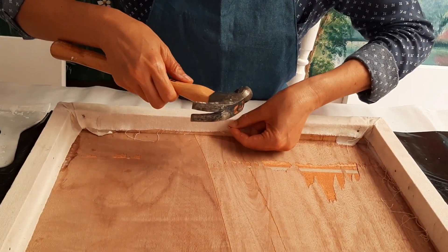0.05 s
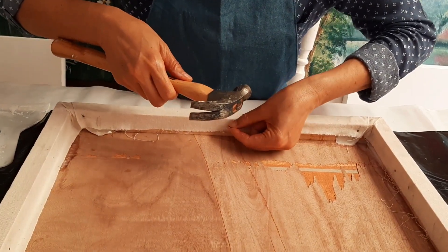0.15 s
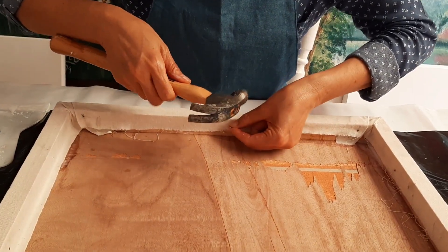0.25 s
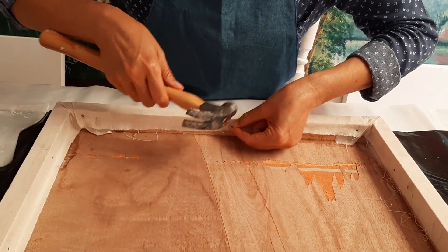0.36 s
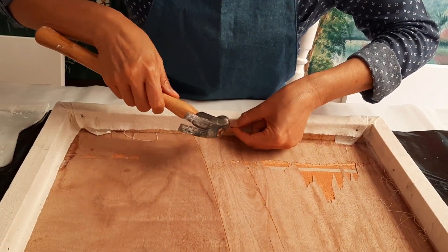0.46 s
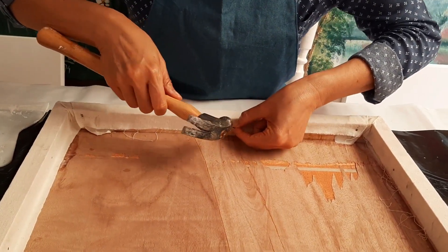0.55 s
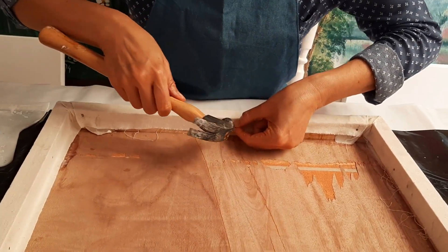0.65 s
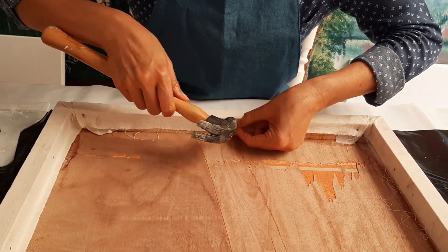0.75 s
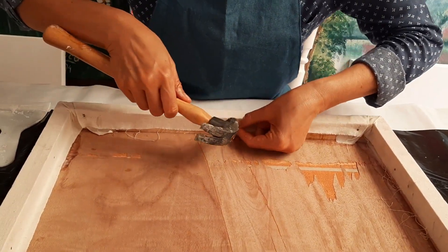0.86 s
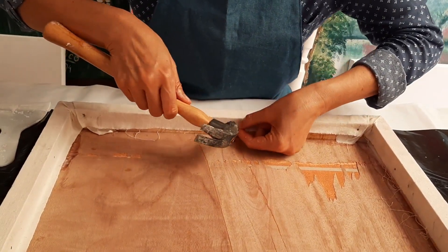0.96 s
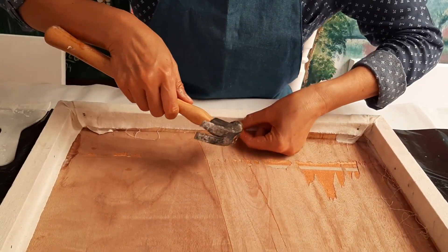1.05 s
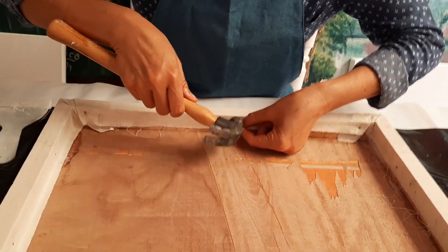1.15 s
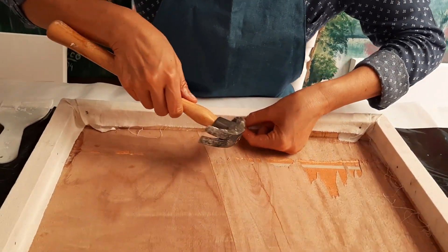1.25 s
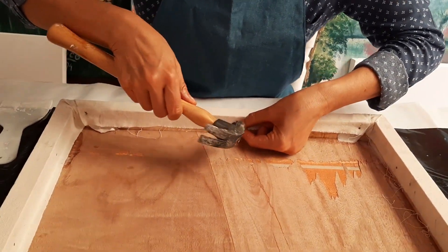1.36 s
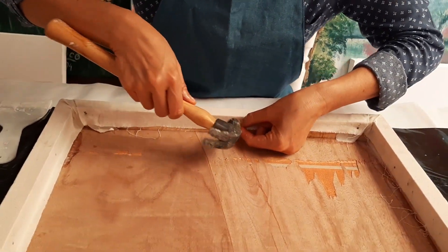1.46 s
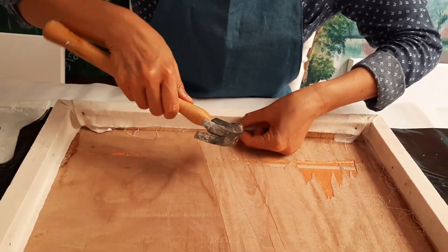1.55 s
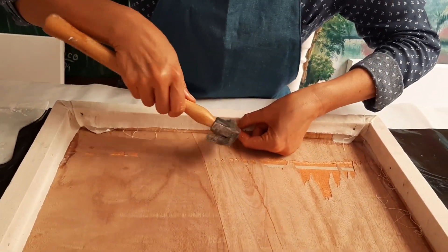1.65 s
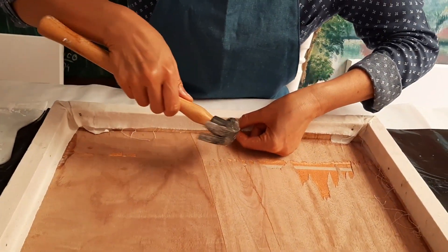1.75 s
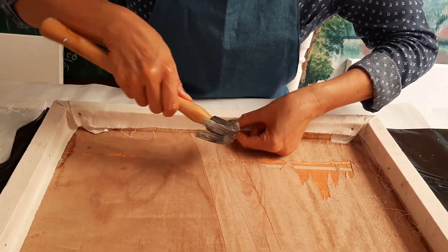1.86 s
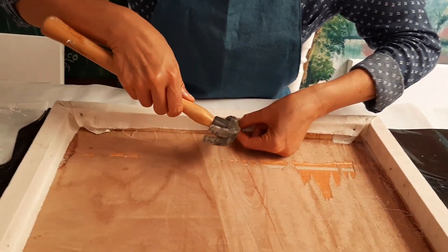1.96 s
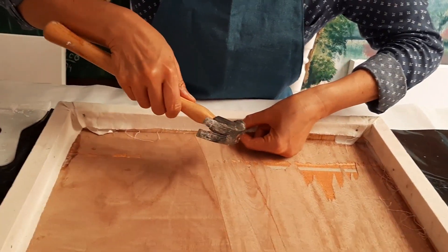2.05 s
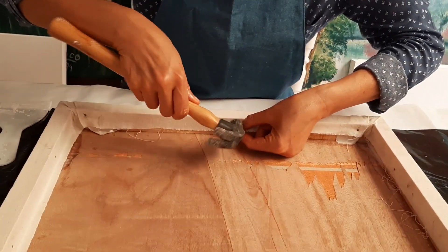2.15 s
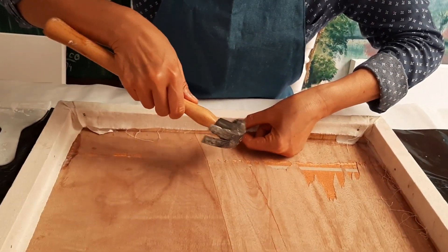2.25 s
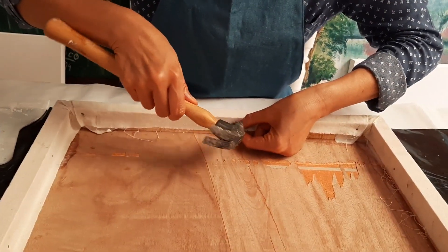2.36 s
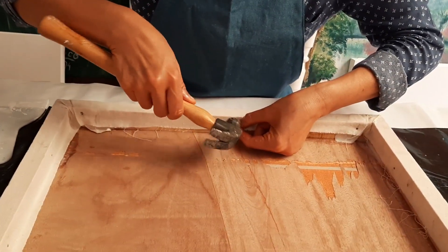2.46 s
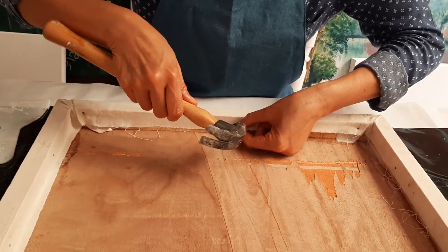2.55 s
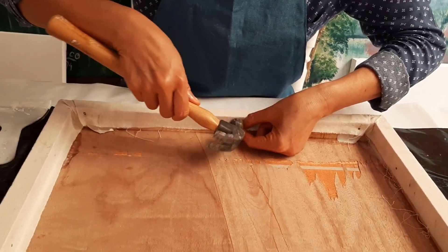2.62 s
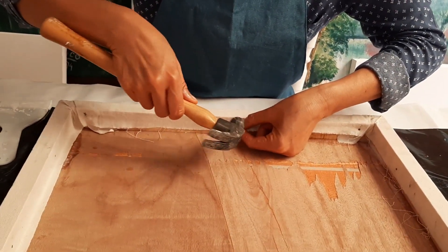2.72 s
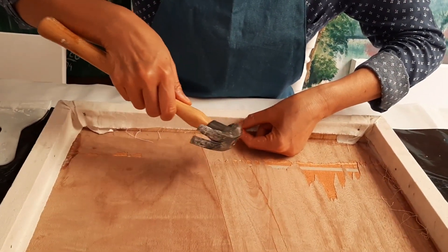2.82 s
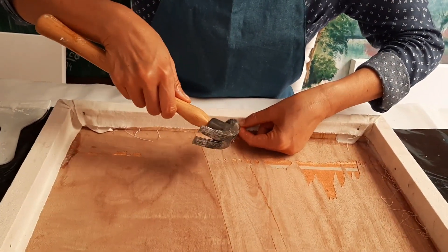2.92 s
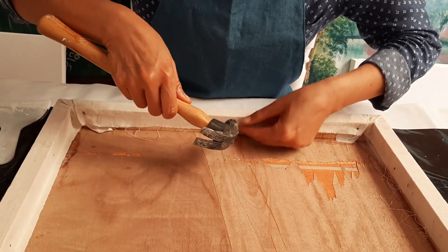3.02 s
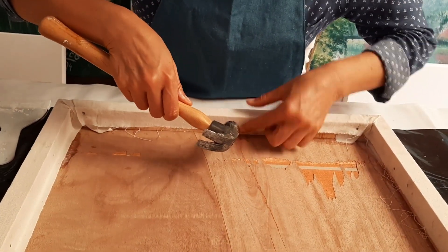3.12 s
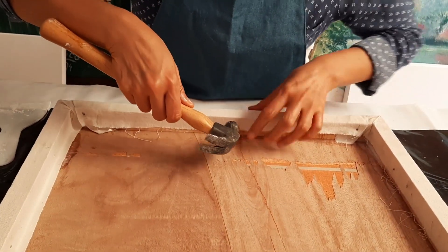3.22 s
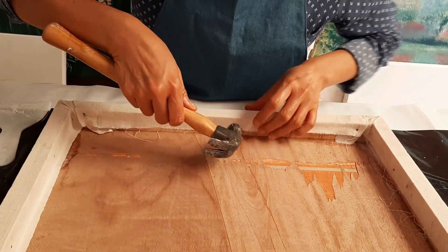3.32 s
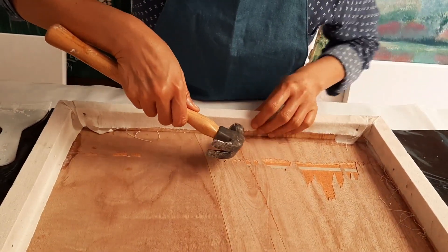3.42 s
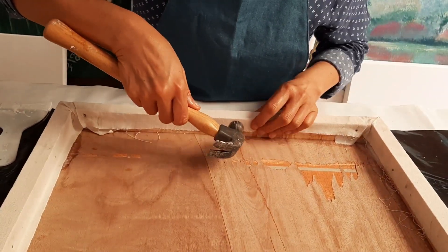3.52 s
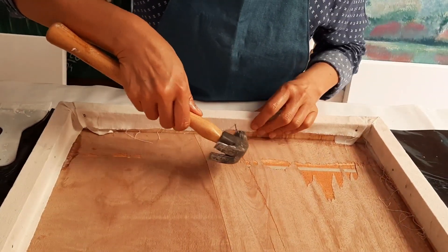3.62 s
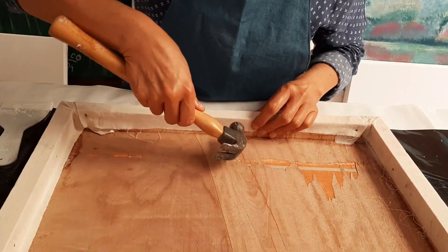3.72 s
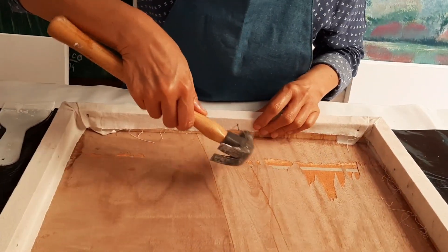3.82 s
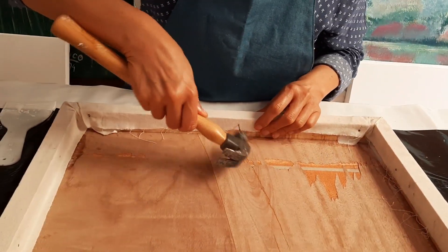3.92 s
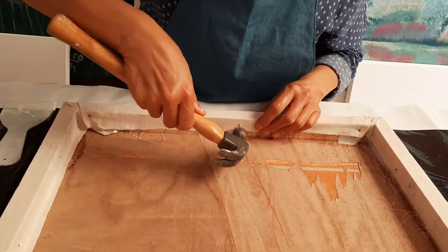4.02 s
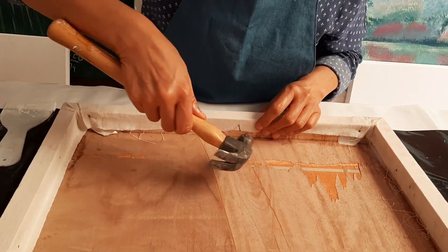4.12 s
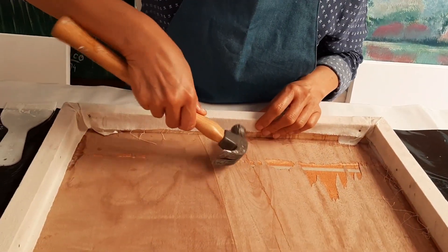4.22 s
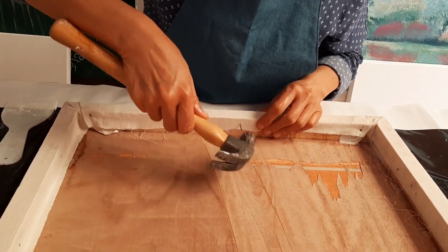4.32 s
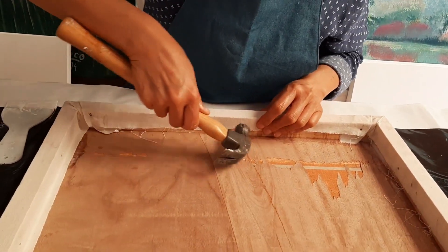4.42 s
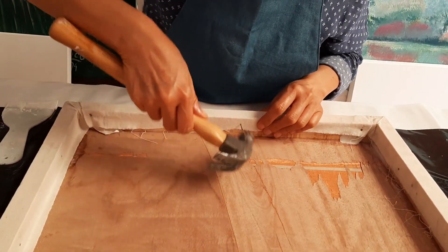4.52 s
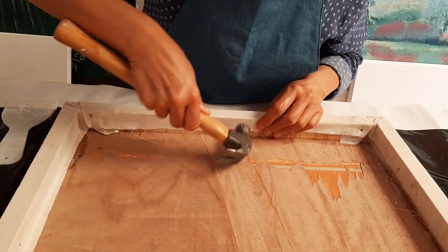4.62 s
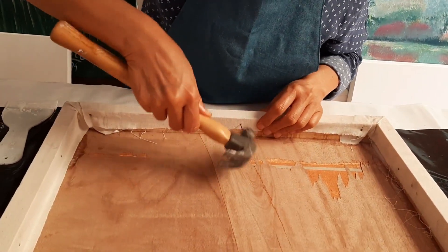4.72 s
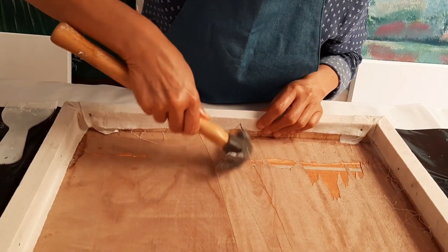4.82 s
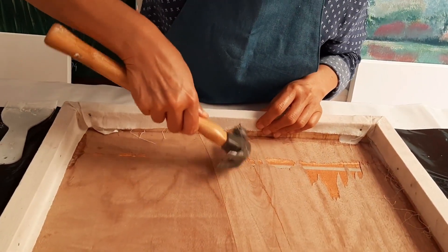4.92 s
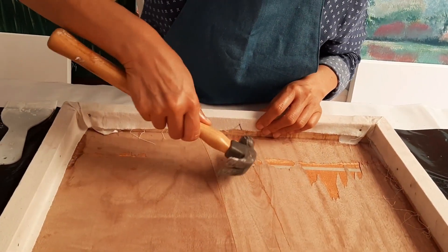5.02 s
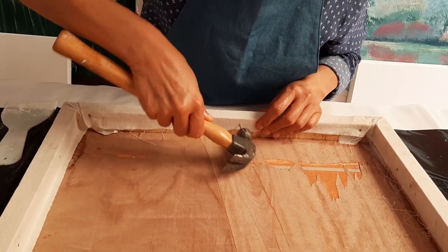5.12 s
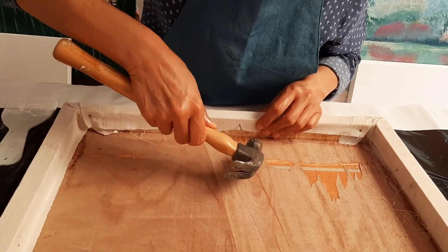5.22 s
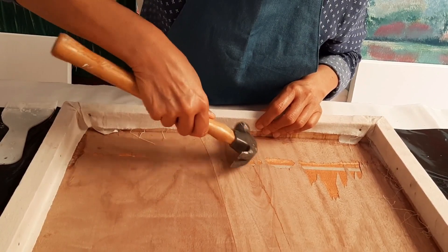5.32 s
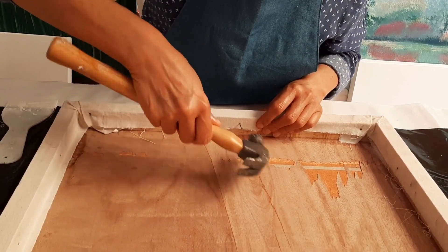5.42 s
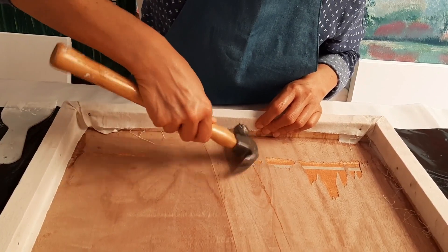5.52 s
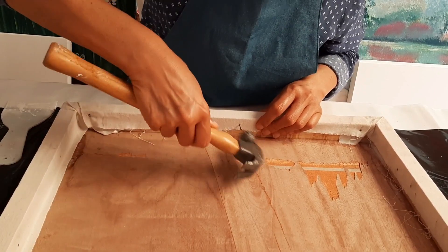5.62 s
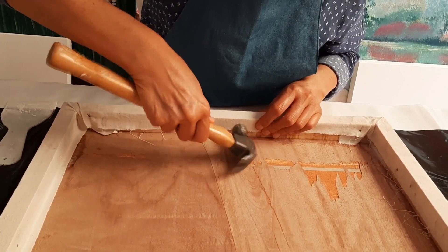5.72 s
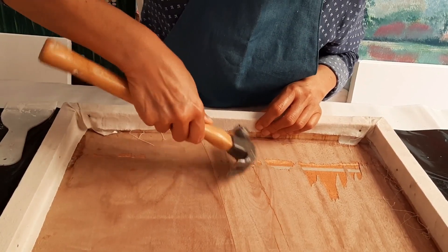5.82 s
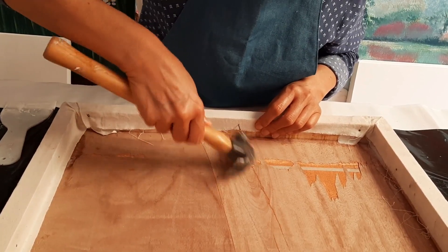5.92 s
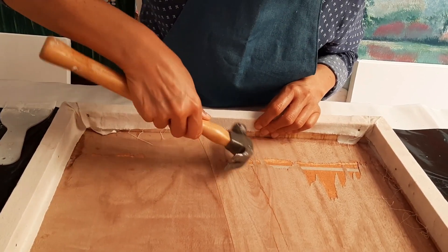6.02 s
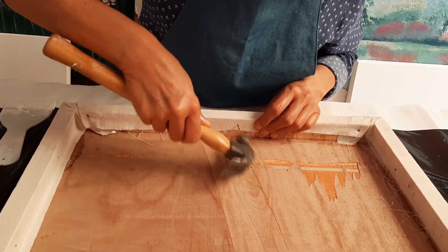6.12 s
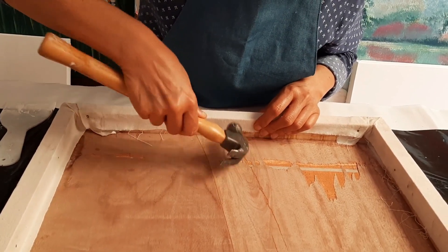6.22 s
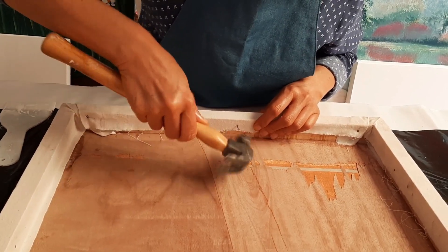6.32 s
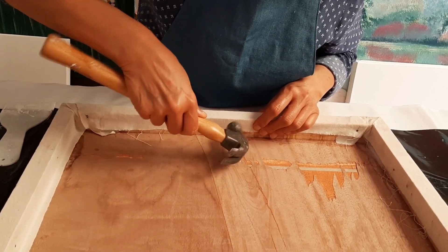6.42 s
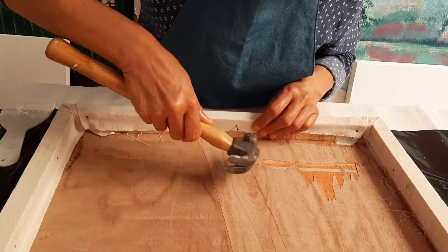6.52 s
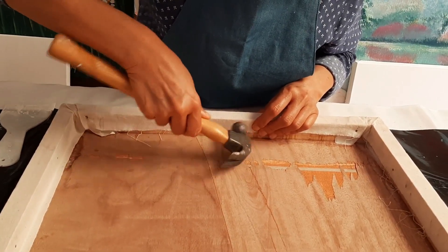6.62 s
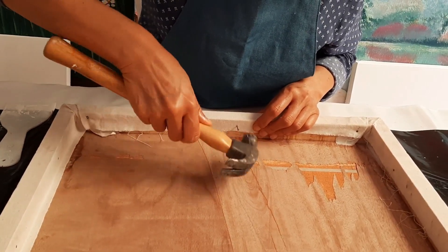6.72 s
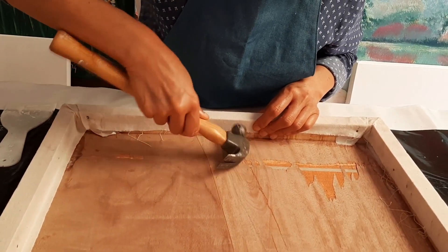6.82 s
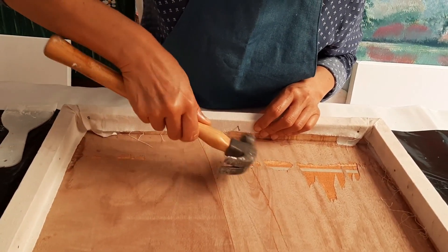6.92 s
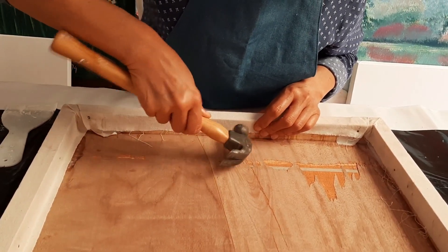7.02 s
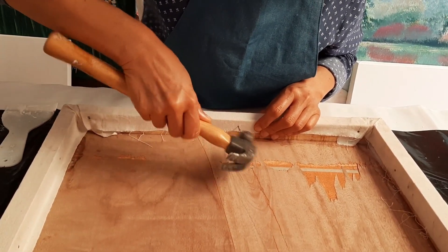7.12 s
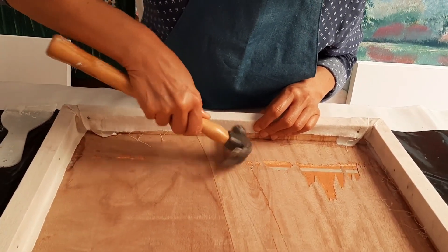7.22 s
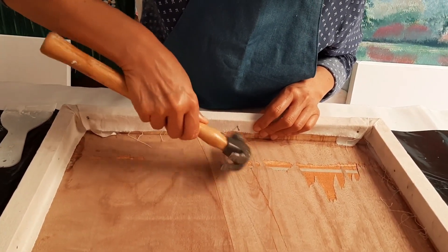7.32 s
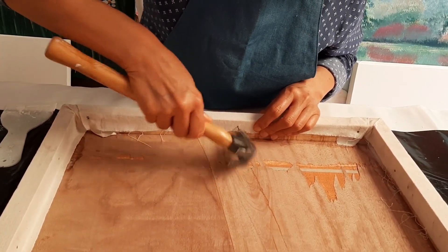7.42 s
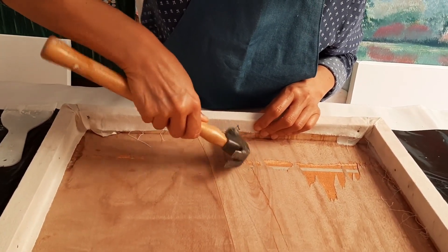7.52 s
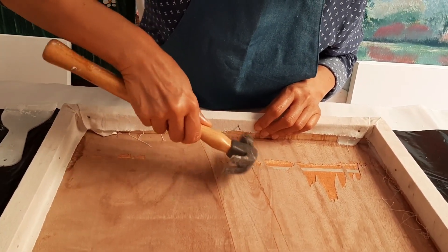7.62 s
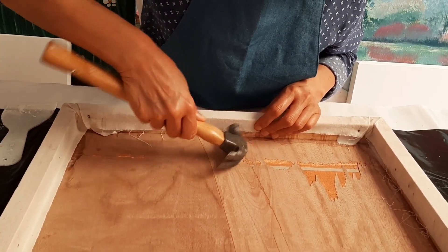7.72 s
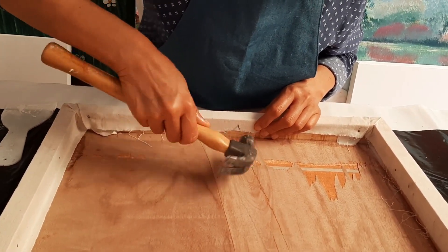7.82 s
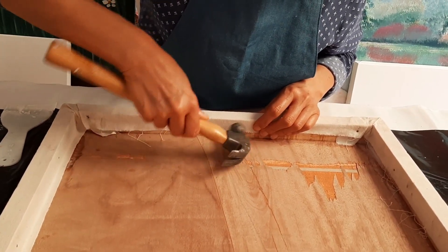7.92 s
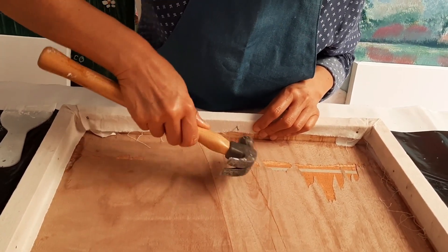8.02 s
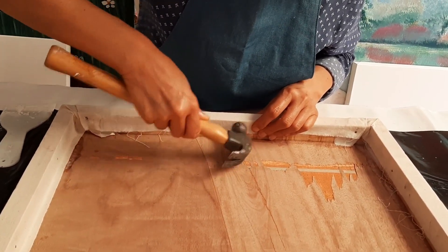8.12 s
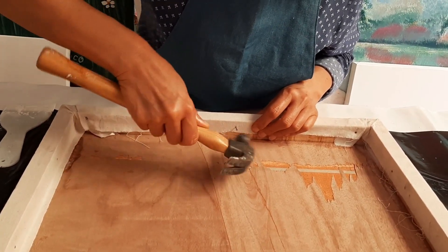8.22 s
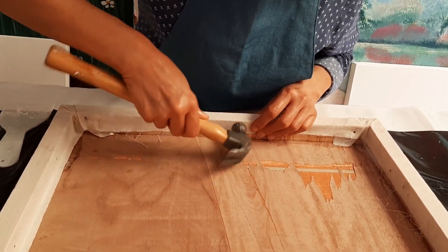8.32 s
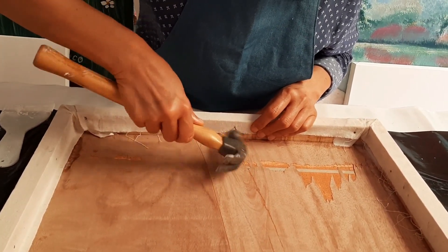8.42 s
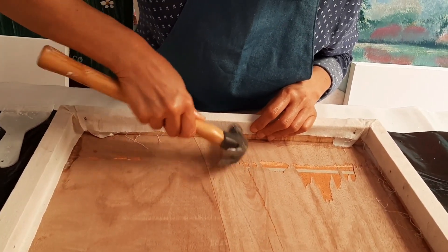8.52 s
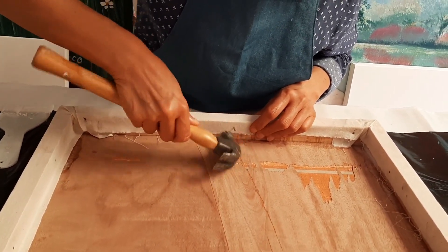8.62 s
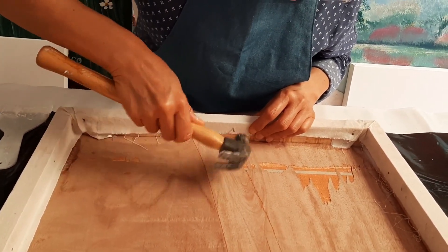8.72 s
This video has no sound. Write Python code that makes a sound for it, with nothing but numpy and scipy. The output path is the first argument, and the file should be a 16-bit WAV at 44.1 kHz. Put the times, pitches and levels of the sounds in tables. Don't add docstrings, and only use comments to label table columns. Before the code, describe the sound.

For the first second there is only low distant traffic rumble, soft hiss and a barely audible falling bird whistle outdoors at 0.2 s. At 1.16 s steel ticks lightly and the hammer head scuffs cloth. A weak glancing tap lands at 1.27 s, a stronger one at 1.5 s, then firm hollow knocks about every quarter second until a lighter, clackier one at 2.7 s. The room echo fades into a pause, with another faint bird whistle around 3.65 s. From 3.8 s hammering resumes, steady at four to five taps per second, woody with a hard steel crack. From 5.85 s, small rebounds closely follow the blows as the nail seats. The taps become tighter and strongest around 8.2-8.6 s. The microphones are close, the direct knocks favour the left, and plywood and a bare room ring on both sides.

```python
import sys
import numpy as np
from scipy import signal
from scipy.fft import rfft, irfft, next_fast_len
from scipy.io import wavfile
from scipy.ndimage import uniform_filter1d, minimum_filter1d, map_coordinates

SR = 44100
rng = np.random.default_rng(int(sys.argv[2]) if len(sys.argv) > 2 else 0)


def invert_db(x):
    u = np.asarray(x, float) / 20
    return 10 ** u


def transcribe(signal):
    frames = np.atleast_2d(signal).T
    limited = np.clip(frames, -1, 1)
    pcm = np.round(limited * 32767).astype(np.int16)
    wavfile.write(sys.argv[1], SR, pcm)


N = 386316

# t/s, strength/dB, clack/dB, click/dB
BLOWS = [(1.273, -26, -11.5, -14.5), (1.527, -16.5, -8.5, -22.5), (1.766, -7, -11, -19),
         (2.011, -7, -10.5, -17.5), (2.26, -7.5, -14, -17.5), (2.499, -7, -16.5, -21),
         (2.732, -11.5, -1.5, -17.5), (3.828, -3.5, -19, -23.5), (4.064, -5.5, -8.5, -17.5),
         (4.298, -5, -9, -18), (4.519, -4, -9.5, -19.5), (4.736, -5, -7.5, -17), (4.952, -5.5, -7, -16),
         (5.201, -7.5, -10.5, -22.5), (5.4, -7, -6, -12), (5.624, -10.5, -5.5, -15), (5.832, -9, -6.5, -14),
         (6.053, -6.5, -6.5, -11), (6.267, -5, -9, -12), (6.476, -1.5, -9, -14), (6.692, -4.5, -9, -13),
         (6.908, -4.5, -11, -12), (7.119, -7, -7.5, -13.5), (7.333, -5.5, -9.5, -12.5),
         (7.549, -4.5, -9, -18), (7.777, -4.5, -10, -11.5), (7.989, -4.5, -9, -15.5),
         (8.204, -2.5, -10, -15), (8.415, -1, -10, -16), (8.638, -1, -12, -16.5)]
# t/s, strength/dB
BOUNCES = [(5.849, -18), (6.08, -13.5), (6.307, -7.5), (6.509, -15.5), (6.727, -5.5), (6.941, -6.5),
           (7.152, -6.5), (7.367, -8), (7.575, -6), (7.593, -25), (7.805, -7.5), (8.011, -7), (8.028, -20),
           (8.226, -9), (8.434, -6), (8.661, -7), (8.675, -21)]
# t/s, seating (0 glancing, 1 loose, 2 half in, 3 home), knock f/Hz, knock level/dB
SEATING = [(1.27, 0.64, 645, 4.6), (1.53, 0.97, 642, 8.4), (1.8, 1.54, 670, 8.1), (2.3, 1.78, 747, 12),
           (2.5, 1.72, 790, 12.5), (2.73, 0.044, 720, 11.1), (3.83, 2.38, 820, 11.3), (4.3, 2.35, 752, 8.5),
           (4.95, 1.87, 672, 10.8), (5.2, 2.6, 844, 14.6), (5.4, 1.92, 677, 10.6), (5.85, 1.88, 706, 14.1),
           (6.3, 2.65, 768, 6), (7, 2.79, 803, 9.4), (8.7, 3.7, 820, 3)]
# f/Hz, level/dB, T60/s
FRAME_MODES = [(129.6, -10, 0.018), (256.5, -5, 0.099), (464, -14, 0.016), (697, 3, 0.062),
               (1173, -6, 0.04), (1545, -3, 0.046), (2336, -1.5, 0.023), (3500, -19, 0.03),
               (4980, -22, 0.023)]
# f/Hz, level/dB
CRACK = [(300, -33), (1000, -10), (2400, -1.5), (5000, -7), (8000, -20.5), (15500, -43), (17000, -53.5)]
# f/Hz, width/Hz, level/dB for a glancing blow, nail loose, half in, home
BOARD_MODES = [(132.7, 10.2, 21, 23, 14.5, 12.5), (193, 13, 9.5, 16, 5.5, 7), (229, 13, -1, 3.7, 8.5, 7.5),
               (315.5, 8.3, 11, 1, 23, 18), (380.4, 6.1, 13, 0.6, 12, 19), (466.5, 15.4, 16, 2.4, 19.5, 18),
               (556, 37, 18, 23.4, -15.5, -28), (648.5, 24, 17, 19, 14, 7.5),
               (734, 21, 10.5, 2.4, 5.5, 5.5), (880, 55, -2, 0.55, -0.5, 5.5), (1165, 178, -1, 2, -1, 13),
               (1503, 16.7, 15.5, 24.3, 13, 13), (1720, 152, 11.5, 7, 11, 6.5),
               (2052, 76, 3, 19.8, 8.5, 11), (2600, 120, 1, 1, -3.5, 2.5), (3470, 710, -7.5, 3, 6.5, 7),
               (4200, 320, 12.5, 14.5, 0, -1), (6390, 760, 5.5, 16.6, 6, 4.5)]
# f/Hz, level/dB per Hz
AIRBORNE = [(30, -61.5), (70, -24), (137, -2.5), (300, -1), (520, -10.5), (700, -7), (1300, -10.5),
            (2200, -9.5), (2800, -17.5), (5200, -24.5), (6800, -32), (8300, -42.5), (15500, -33.5),
            (16500, -94)]
# f/Hz, T60/s
REVERBERATION = [(100, 0.97), (300, 0.46), (1000, 0.49), (3000, 0.55), (7000, 0.5), (13000, 0.3)]
# f/Hz, likeness
COHERENCE = [(60, 0.15), (240, 0.98), (950, 0.23), (3770, -0.15), (15000, 0.12)]
# f/Hz, level/dB
LEAN = [(60, 29.5), (180, 9.5), (550, -3), (1650, -3), (4970, -8), (15000, -1)]
# t/s, level/dB
SCRAPE = [
    (1.159, -33.5),
    (1.172, -39.5),
    (1.2, -38.5),
    (1.26, -37.5),
    (1.31, -36),
    (1.36, -53),
]
# f/Hz, level/dB
CLOTH = [(180, -39), (300, -0.5), (537, -3.5), (1080, -22), (2140, -4), (3190, -10), (5250, -3.5),
         (8360, -17.5), (16000, -10.5)]
# t/s, level/dB
TICK = (1.1585, -23)
# t/s, duration/s, start f/Hz, end f/Hz, level/dB
CHIRPS = [
    (0.214, 0.23, 5050, 3430, -72),
    (0.245, .12, 5250, 4570, -77),
    (0.573, 0.17, 6080, 4130, -88),
    (3.323, 0.063, 5750, 5620, -91),
    (3.375, 0.062, 4700, 4200, -90),
    (3.65, 0.2, 5710, 3400, -74),
    (3.67, 0.096, 5880, 4900, -80),
]
# t/s, rumble level/dB, hiss level/dB
QUIET = [(0, -50.5, -68.5), (.4, -41.5, -68.5), (.65, -48.5, -66), (.8, -39.5, -70), (1.13, -42.5, -66.5),
         (3.35, -46.5, -73), (3.66, -36.5, -71.5), (3.9, -31, -69), (5, -43, -71)]
# f/Hz, level/dB per Hz
RUMBLE = [(15, -31), (25, -19), (102, -3.5), (129, 1.5), (152, -16.5), (198, -8.5), (226, -14.5),
          (264, -15.5), (450, -40), (580, -78.5), (990, -120)]
# f/Hz, level/dB per Hz
HISS = [(180, -45.5), (300, -5), (470, -12), (537, -8.5), (828, -11.5), (1300, -15.5), (1520, -10.5),
        (1750, -18), (5800, -25), (10500, -31), (12500, -19), (16000, -17.5)]


def along(points, hz):
    f, v = np.transpose(points)
    return np.interp(np.log(hz + 1), np.log(f + 1), v)


def curves(rows):
    s, *columns = np.transpose(rows)
    return [np.interp(np.arange(N) / SR, s, c) for c in columns]


def wobble(rate):
    knots = rng.standard_normal(int(N * rate / SR) + 4)
    return map_coordinates(knots, [np.arange(N) * rate / SR])


def filtered(x, response):
    m = next_fast_len(N + SR)
    hz = np.fft.rfftfreq(m, 1 / SR)
    return irfft(rfft(x, m) * response(hz), m)[..., :N]


def causal(db):
    cepstrum = irfft(np.log(invert_db(db)))
    half = len(cepstrum) // 2
    cepstrum[1:half] *= 2
    cepstrum[half + 1:] = 0
    return irfft(np.exp(rfft(cepstrum)))


def ports(a, b, hz):
    angle = np.arccos(np.clip(along(COHERENCE, hz), -1, 1)) / 2
    mid, side = a * np.cos(angle), b * np.sin(angle)
    half_lean = along(LEAN, hz) / 2
    return np.array([(mid + side) * invert_db(half_lean), (mid - side) * invert_db(-half_lean)])


def rush(spectrum):
    a, b = rfft(rng.standard_normal((2, N)))
    hz = np.fft.rfftfreq(N, 1 / SR)
    noise = irfft(ports(a, b, hz) * invert_db(along(spectrum, hz)), N)
    return noise / np.sqrt(np.mean(noise ** 2) + 1e-20)


def tail(colour, rise):
    hz, t, z = signal.stft(rng.standard_normal((2, SR)), SR, nperseg=512)
    decay_db = 60 * t / along(REVERBERATION, hz)[:, None]
    z = ports(*z, hz[:, None]) * invert_db(along(colour, hz)[:, None] - decay_db)
    answer = signal.istft(z, SR, nperseg=512)[1][:, :SR]
    answer = answer * (1 - np.exp(-np.arange(SR) / SR / rise))
    return answer / np.linalg.norm(answer) * np.sqrt(2)


def nail(s):
    times, *columns = np.transpose(SEATING)
    return [np.interp(s, times, c) for c in columns]


def contacts():
    rows = []
    for s, db, clack, click in BLOWS:
        direct = 42.5 + 1.47 * db + 0.8 * clack
        glancing = max(1 - nail(s)[0], 0)
        thud = -28 - 0.64 * db - 8.5 * glancing
        rows.append((s, direct, thud, clack, click, db, 0))
    for s, db in BOUNCES:
        clack = -24 + 4 * nail(s)[0]
        rows.append((s, 21.5 + 0.74 * db, -31 - 0.57 * db, clack, -19, db, -9))
    return rows


def rail(late, colour, seating, knock_hz, soft_db):
    hz, level, t60 = np.transpose(FRAME_MODES)[..., None]
    chance = rng.standard_normal((len(FRAME_MODES), 2))
    knock = hz == hz[3]
    decay_db = 60 * np.abs(late) / t60 * (1.85 + 0.35 * seating)
    modes = invert_db(level + along(colour, hz) + soft_db * (hz > 2000) + 0.42 * chance[:, :1] - decay_db)
    modes *= invert_db(np.where(knock, -1.6 * seating, 1.2 * seating * (np.abs(hz - 1200) < 200)))
    pitch = np.where(knock, knock_hz, hz * (1 + chance[:, 1:] / 18))
    onset = 1 + np.exp(-late / 0.00027)
    return (modes * np.sin(2 * np.pi * pitch * late)).sum(0) / onset


def steel_crack(late, spectrum_db):
    decay = np.where(late > 0, late / 0.021, -late / 0.0031)
    spit = invert_db(-60 * decay)[:512] * rng.standard_normal(512)
    spit[np.argmax(late > 0)] = 14
    return np.convolve(spit / np.linalg.norm(spit), causal(spectrum_db))[:len(late)]


def hammer(count=4):
    near, sent = np.zeros(N + SR), np.zeros((count, N + SR))
    size = 8192
    grid = np.fft.rfftfreq(size, 1 / SR)
    late = np.arange(size) / SR - 0.0019
    for k, (s, db, thud, clack, click, room_db, soft_db) in enumerate(contacts()):
        seating, knock_hz, knock_db = nail(s)
        hollow = knock_db - 10
        thud = thud - 0.8 * max(hollow, 0)
        shake = 9.5 - seating
        colour = [(60, thud + 20 + shake), (200, thud + 20), (700, 0.0081), (1700, clack + 8),
                  (5000, click + 20), (9000, click + 20 - 0.44 * hollow)]
        tint = along(colour, grid)
        ring = rail(late, colour, seating, knock_hz, soft_db)
        blow = ring + invert_db(17.5 + soft_db) * steel_crack(late, along(CRACK, grid) + tint)
        start = round(s * SR)
        near[start:][:size] += invert_db(db) * blow / np.abs(blow).max()
        push = causal(tint + board(grid, seating, knock_hz, knock_db))
        sent[k % count, start:][:size] += invert_db(room_db + 27) * push
    return near[:N], sent[:, :N]


def resonance(f, centre, width, db):
    return (invert_db(db) - 1) * width * f / np.hypot(centre * centre - f * f, f * width + 1)


def board(f, seating, knock_hz, knock_db):
    total = 0.6 + resonance(f, knock_hz, 150, knock_db + 1)
    for centre, width, *levels in BOARD_MODES:
        db = np.interp(seating, range(len(levels)), levels)
        total = total + resonance(f, centre, width, db)
    return 20 * np.log10(np.maximum(total, 0.05))


def panel(sent):
    def low(hz):
        return invert_db(4 + along(AIRBORNE, hz)) / (1 + 1j * hz / 700) ** 2
    ring = filtered(sent.sum(0), low)
    return np.pad(ring, (150, 0))[:N] * invert_db([[1.5], [-1.5]])


def room(sent, same=0.82):
    shared = tail(AIRBORNE, rise=0.00033)
    wet = 0
    for x in sent:
        varied = 2 * tail(AIRBORNE, rise=0.023)
        wet = wet + signal.fftconvolve(x[None], same * shared + (1 - same) * varied, axes=1)
    return np.pad(wet, ((0, 0), (200, 0)))[:, :N]


def touch():
    tick_s, tick_db = TICK
    t = np.arange(N) / SR - tick_s
    grains = invert_db(curves(SCRAPE)[0] + 1.1 * wobble(130)) * rush(CLOTH) * (np.arange(N) > tick_s * SR)
    tick = invert_db(tick_db - 60 * np.abs(t) / 0.0045) * (t > 0) * rng.standard_normal(N)
    return grains * (t < 0.25) + tick * invert_db([[0], [-7]])


def bird():
    song = np.zeros(N)
    for s, length, from_hz, to_hz, db in CHIRPS:
        u = np.arange(round(length * SR)) / (length * SR)
        glide = from_hz + (to_hz - from_hz) * u ** 0.57
        pitch = glide * (1 + 0.042 * wobble(300)[:len(u)])
        whistle = np.sin(np.pi * u) * np.sin(2 * np.pi * np.cumsum(pitch) / SR)
        song[round(s * SR):][:len(u)] += invert_db(db) * whistle
    far = tail([(100, 0), (9000, 0)], rise=0.0023) * invert_db(-60 * np.arange(SR) / SR / 8.8)
    return invert_db(22.5) * signal.fftconvolve(song[None], far, axes=1)[:, :N]


def background():
    rumble_db, hiss_db = curves(QUIET)
    rumble = invert_db(rumble_db - 5.0 + 3.5 * wobble(11)) * rush(RUMBLE) * invert_db([[1.5], [-3]])
    return rumble + invert_db(hiss_db + 8.0) * rush(HISS)


def scene():
    near, sent = hammer()
    direct = near * invert_db([[0], [-32]])
    return direct + panel(sent) + room(sent) + touch() + bird() + background()


def recover(cut_db, release):
    t = np.arange(N) / SR / release
    return np.exp(np.maximum.accumulate(np.log(cut_db + 1e-9) + t) - t)


def band_limit(x):
    return signal.sosfilt(signal.butter(12, 16780, fs=SR, output="sos"), x)


def record(dry):
    cut_db = 20 * np.log10(np.maximum(np.abs(dry).max(0) / 1.253, 1))
    cut_db = -minimum_filter1d(-cut_db, size=265)
    cut_db = np.maximum(recover(cut_db, release=0.021), recover(0.63 * cut_db, release=0.15))
    x = dry * invert_db(-uniform_filter1d(cut_db, size=131))
    clipped = x / (1 + np.abs(x) ** 8) ** (1 / 8)

    def band(hz):
        bass_cut = (1j * hz / (1j * hz + 50)) ** 2
        return bass_cut / np.sqrt(1 + (hz / 15900) ** 160)
    return band_limit(filtered(clipped, band))


dry = scene()
out = record(dry)
transcribe(out)
```